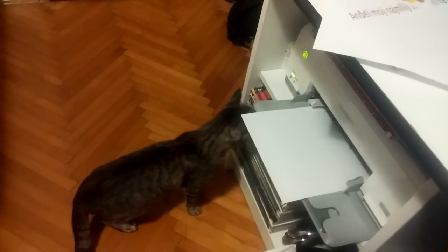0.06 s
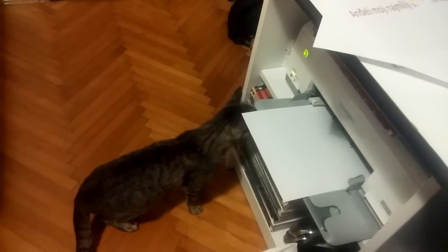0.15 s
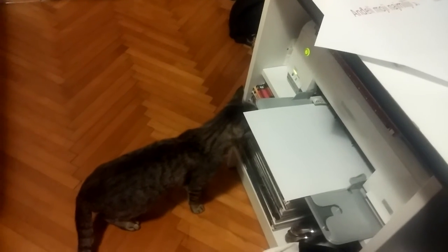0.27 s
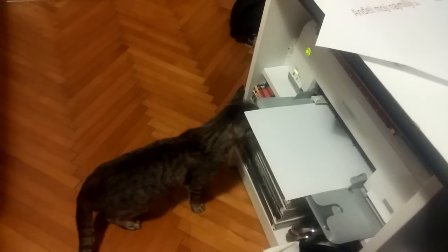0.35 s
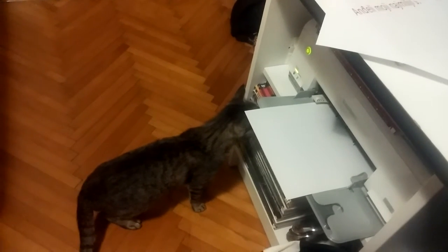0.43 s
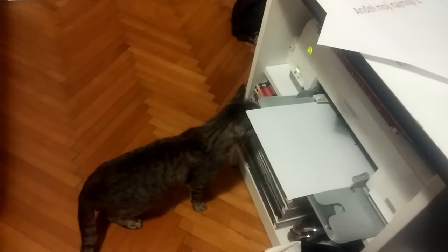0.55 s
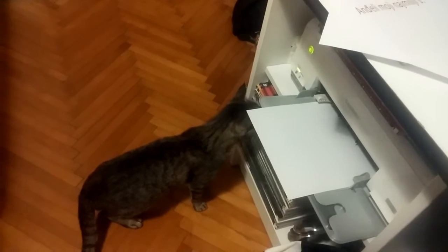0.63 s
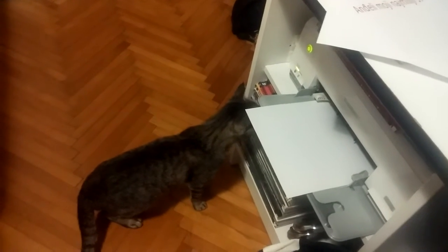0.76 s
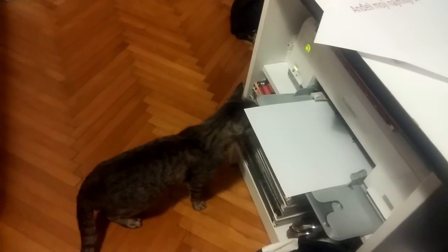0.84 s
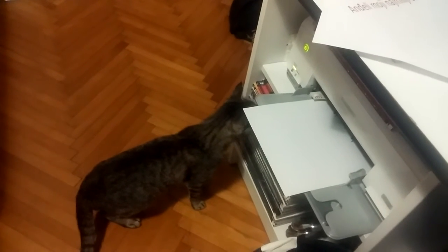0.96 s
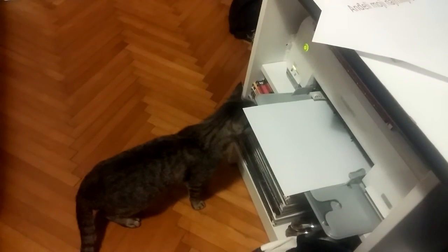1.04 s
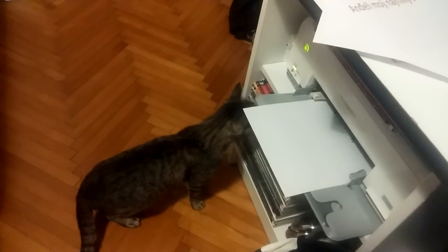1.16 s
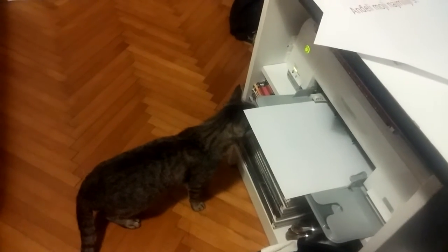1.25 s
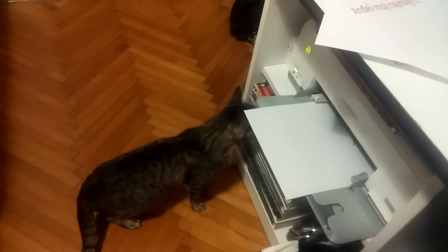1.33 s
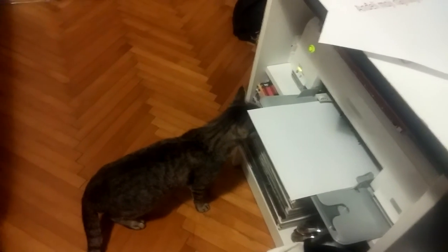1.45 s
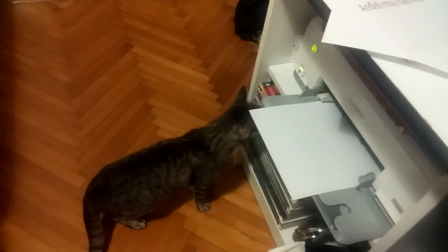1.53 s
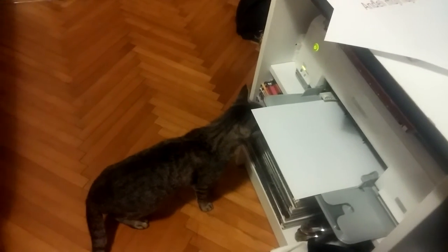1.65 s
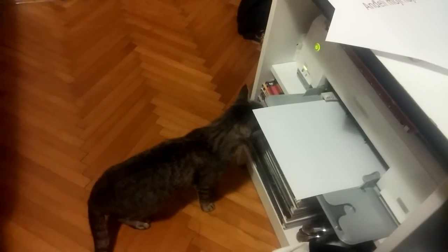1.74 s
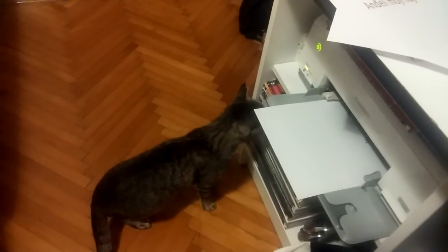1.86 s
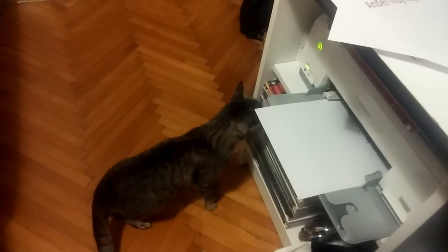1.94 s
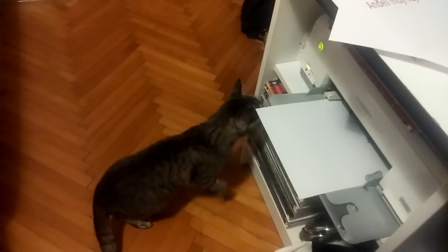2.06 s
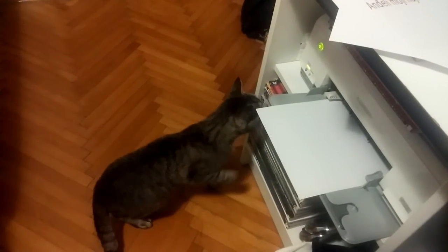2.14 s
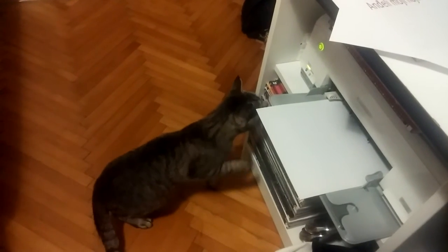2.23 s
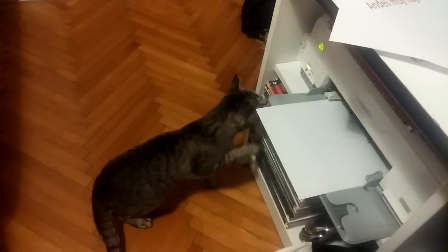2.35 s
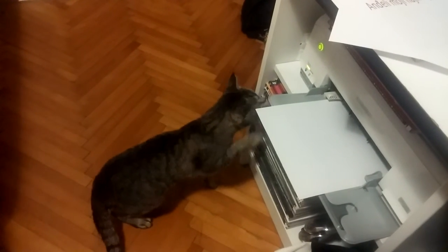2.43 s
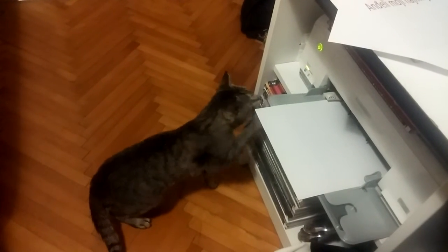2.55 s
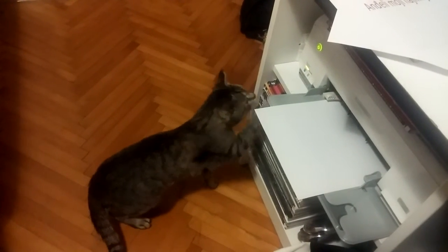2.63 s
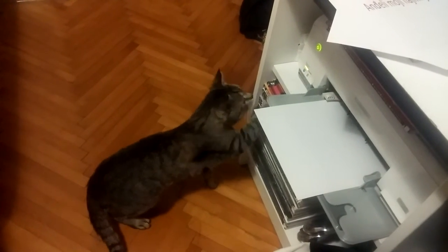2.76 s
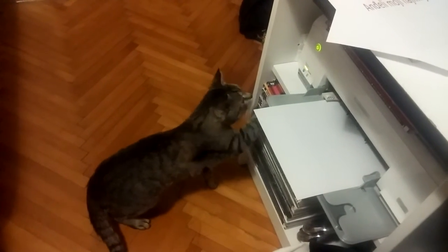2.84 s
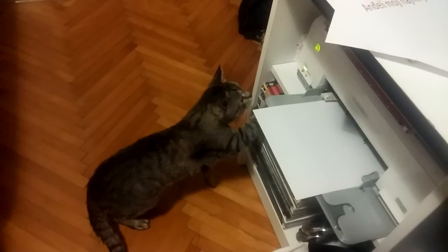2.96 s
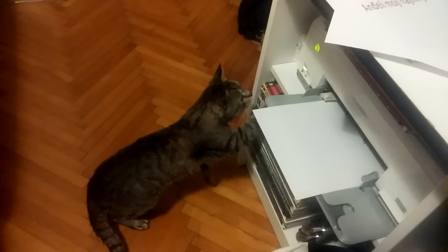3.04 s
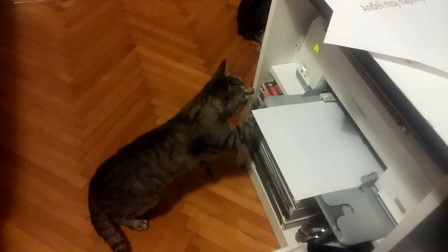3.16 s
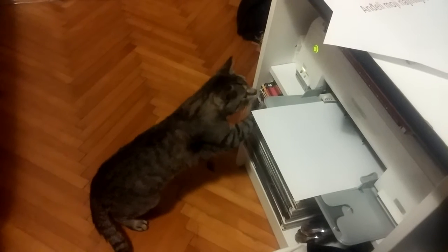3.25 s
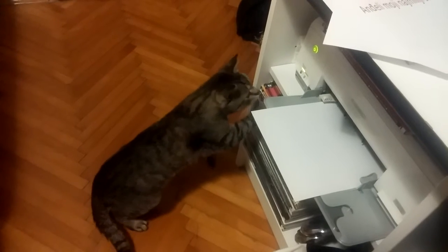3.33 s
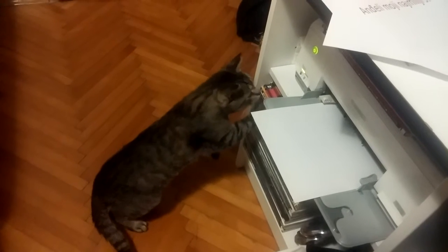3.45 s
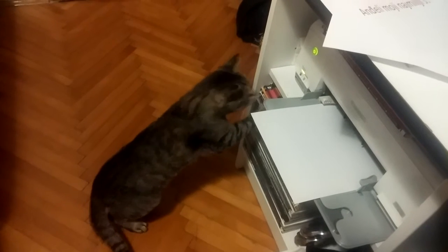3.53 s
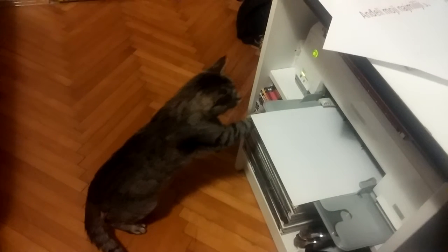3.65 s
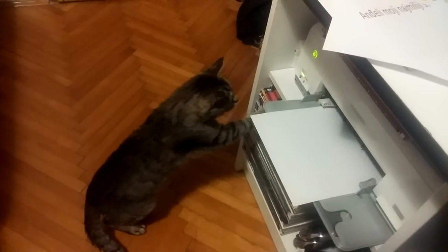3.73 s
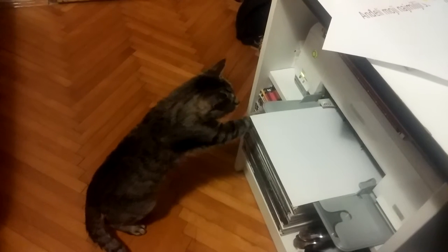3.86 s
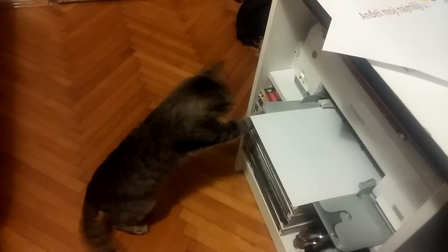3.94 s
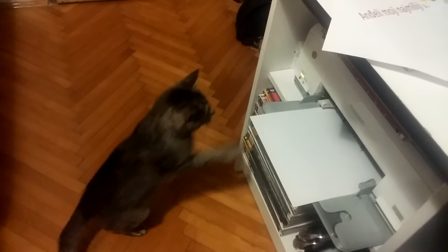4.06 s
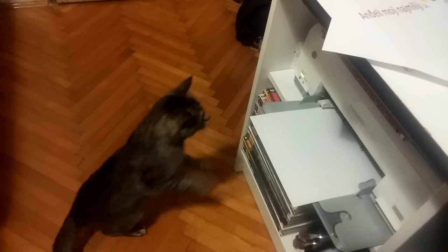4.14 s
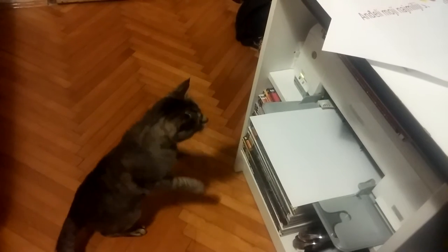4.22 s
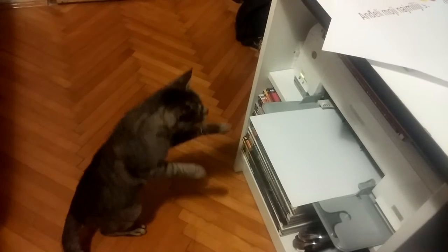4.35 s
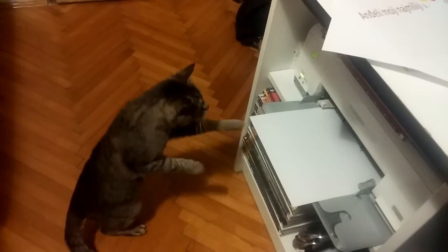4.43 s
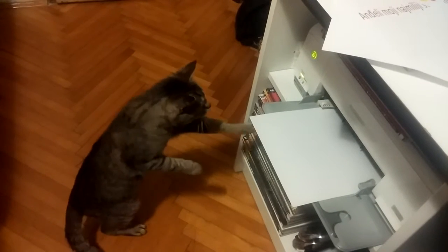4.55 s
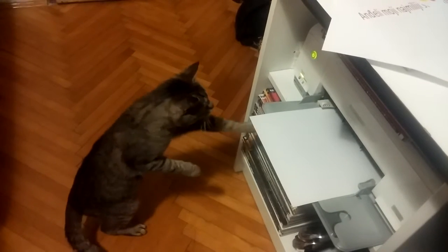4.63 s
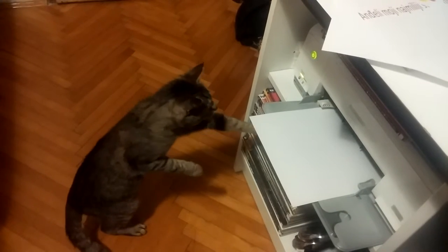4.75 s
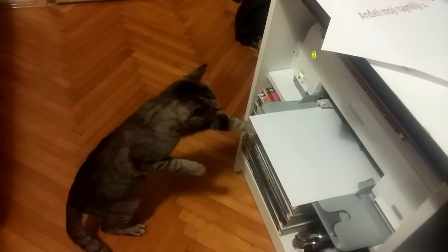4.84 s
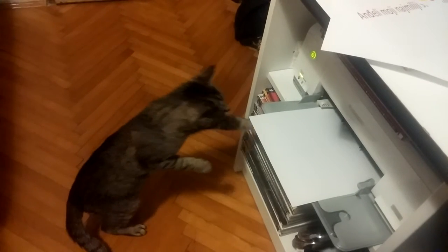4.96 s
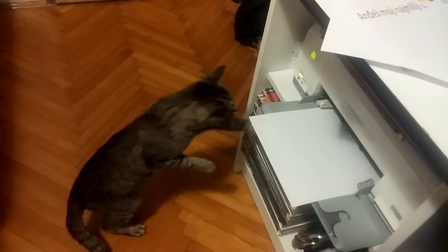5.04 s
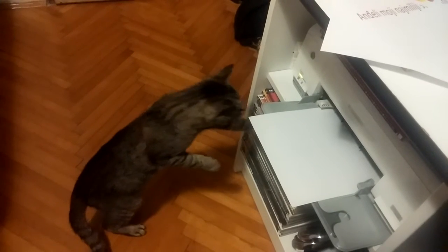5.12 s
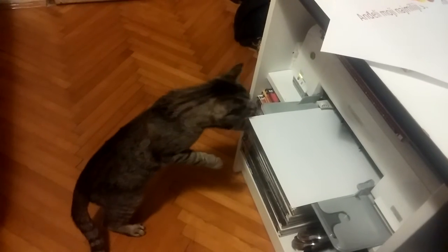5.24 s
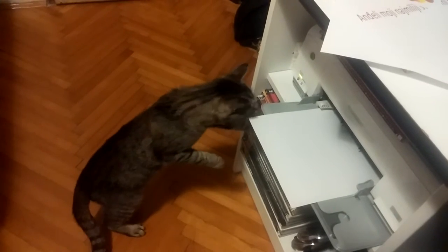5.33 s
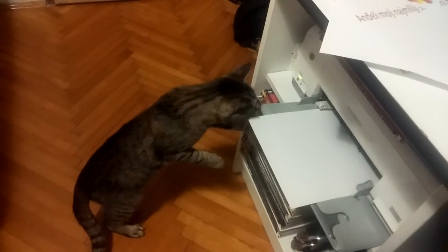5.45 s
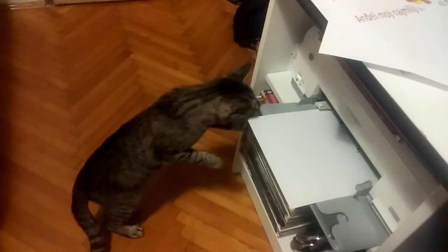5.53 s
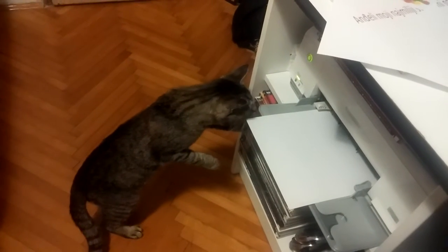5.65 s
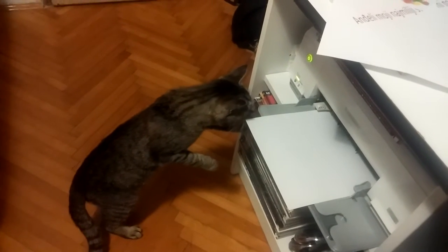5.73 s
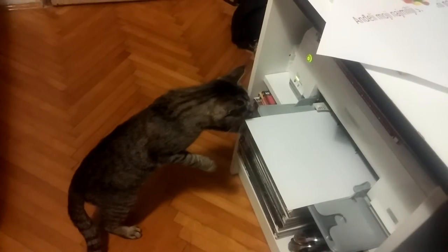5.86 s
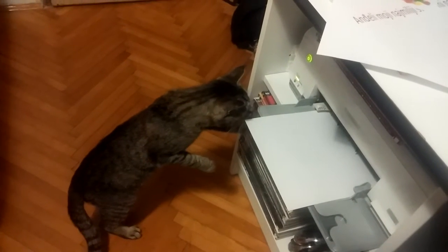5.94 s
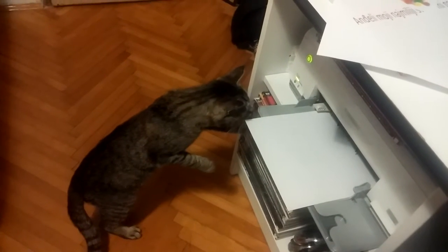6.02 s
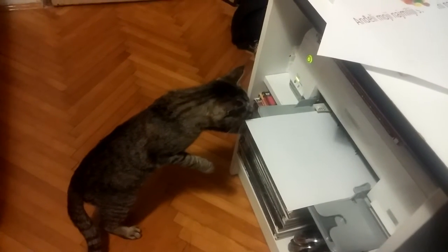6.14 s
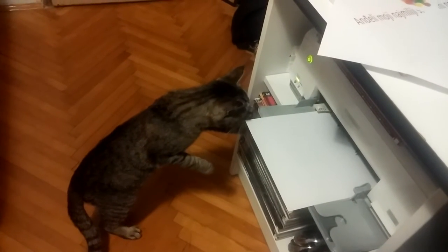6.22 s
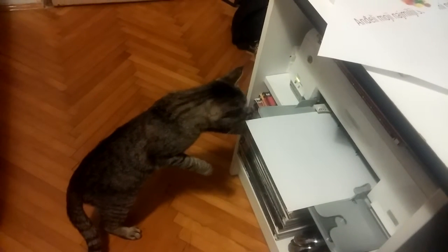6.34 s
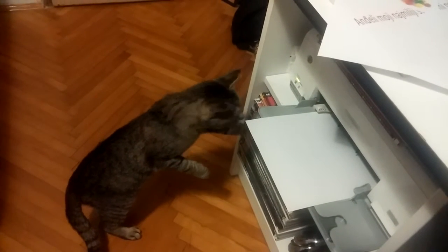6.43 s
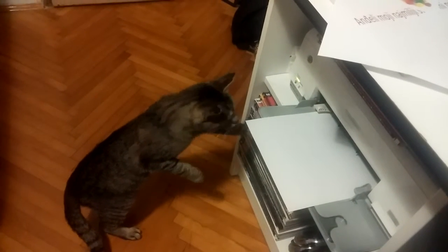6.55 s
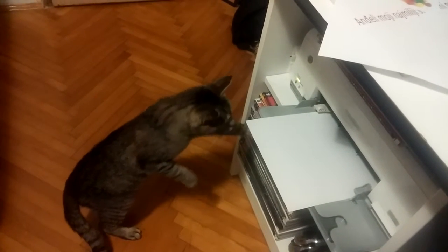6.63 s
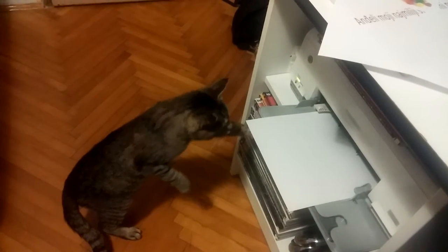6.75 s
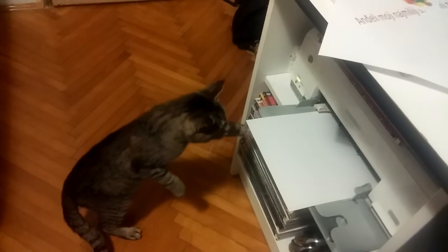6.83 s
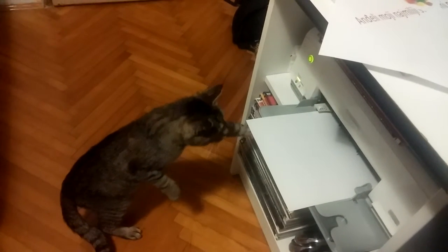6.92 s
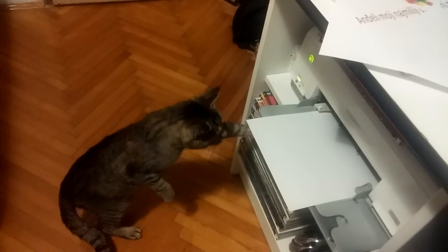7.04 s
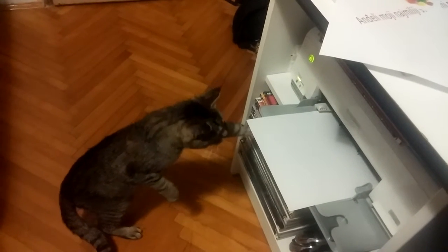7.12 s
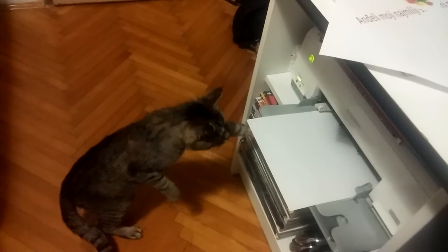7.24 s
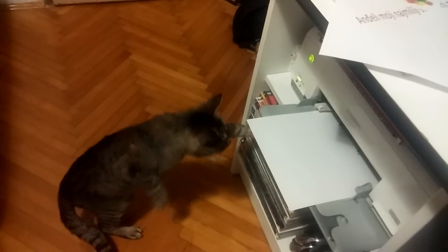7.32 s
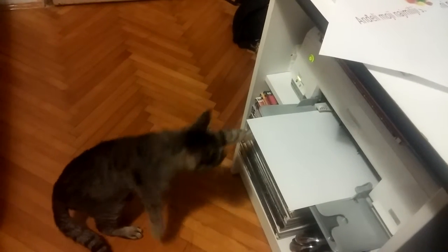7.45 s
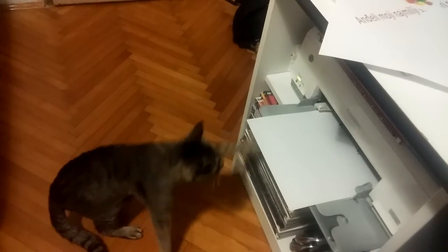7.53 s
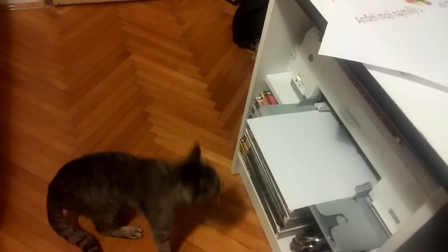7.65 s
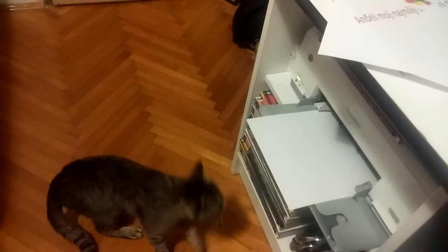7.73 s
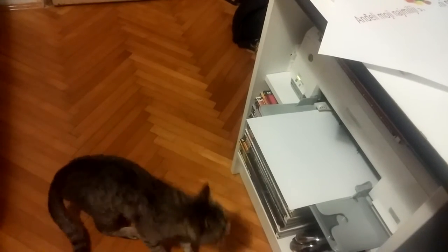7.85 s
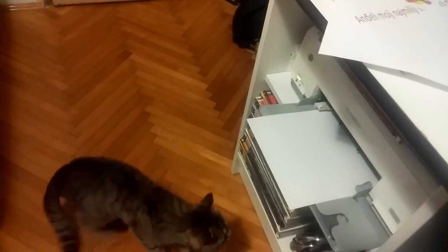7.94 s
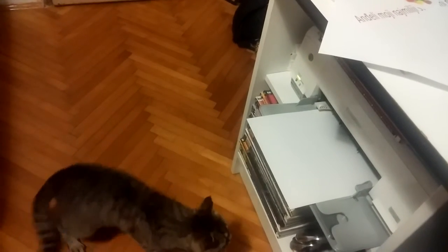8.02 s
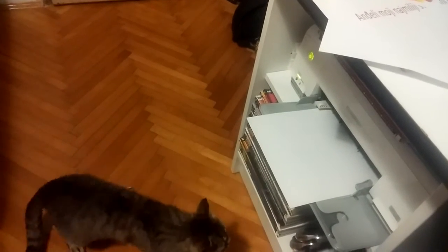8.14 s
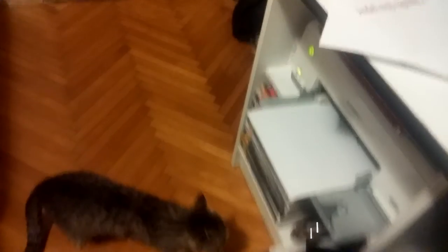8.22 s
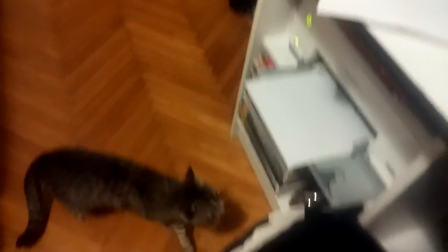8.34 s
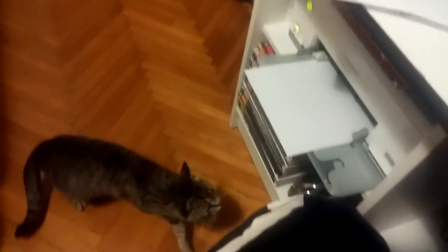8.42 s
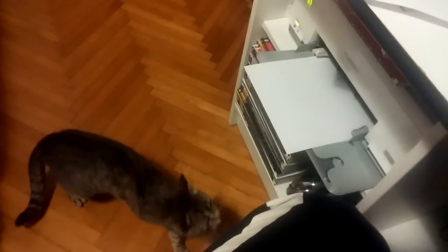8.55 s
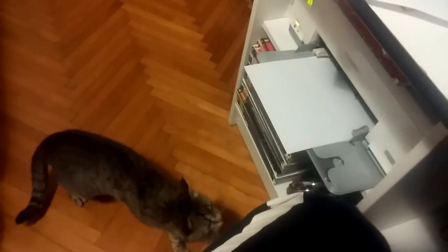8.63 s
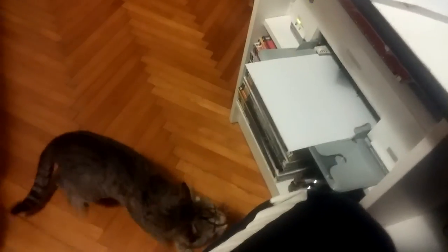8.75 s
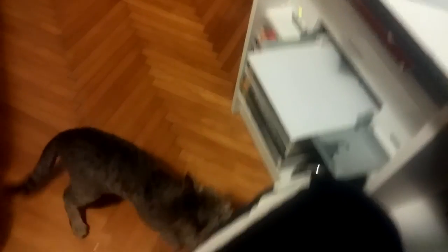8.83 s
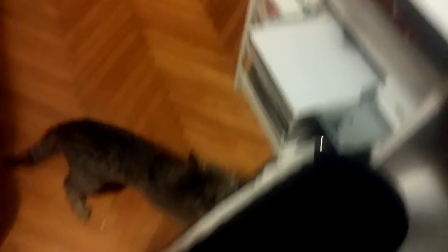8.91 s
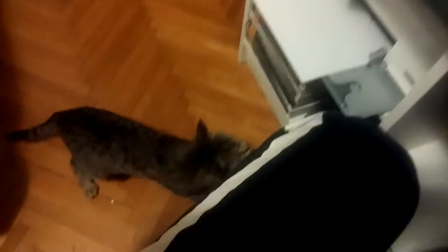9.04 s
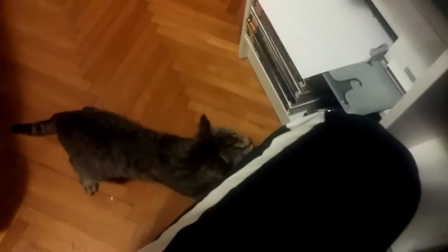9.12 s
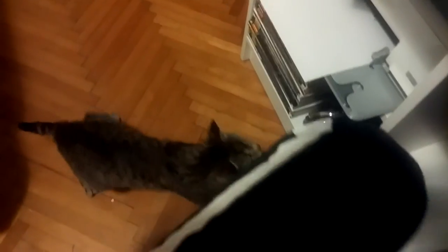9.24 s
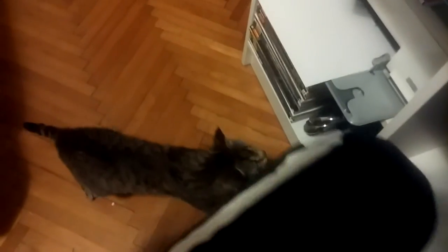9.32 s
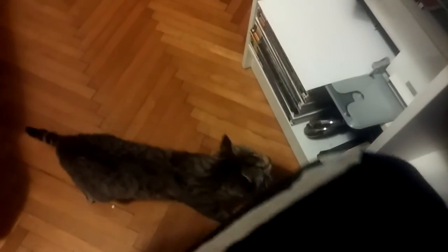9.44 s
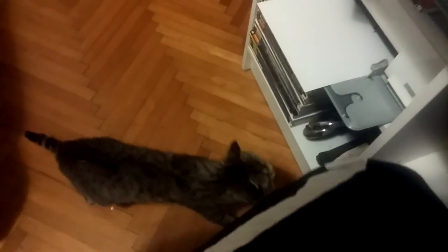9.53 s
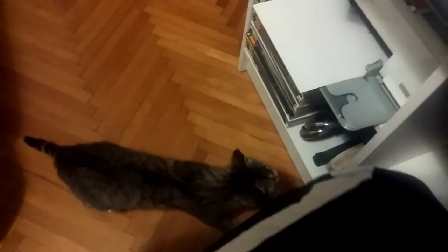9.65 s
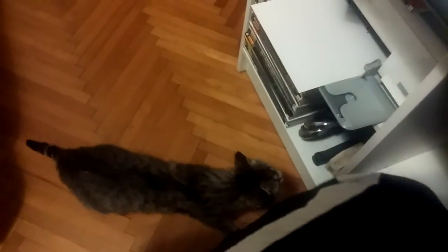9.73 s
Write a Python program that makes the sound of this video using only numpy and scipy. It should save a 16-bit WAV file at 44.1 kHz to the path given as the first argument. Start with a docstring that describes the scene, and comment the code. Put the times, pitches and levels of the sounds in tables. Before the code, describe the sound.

A quiet indoor room with soft air noise and a low wavering hum; a printer close by, louder on the left. The tail of a gear purr at 0 s, then short faint purrs around 0.7 and a stronger one at 1.3 s. Two tiny bright ticks at about 2 s, on the right, the second much louder. Faint gear moves at 2.6 and 3.7 s. At 4.1 s a latch drops with a loud, sharp double clunk and deep thump; a mid-pitched motor whine swells until 4.5 s. Hard clacks at 4.8-4.9 s, then rollers and gears whir to 5.9 s with a clack near 5.7. Printing passes run at 6.0-7.0, 7.2-8.2 and 8.3-9.3 s: dense plastic rattle, juddering carriage, airy paper rasp, springy snaps and low shelf thumps, with strong clacks near 8.2 and 9.2 s. From 9.6 s a ratchet knocks evenly and rapidly to the end.

```python
"""An inkjet printer works in a quiet room, louder on the left; air noise and a low hum waver throughout.
A gear train, toothed pulses through frame resonances, purrs in short moves; at 2 s two small bright ticks ring.
At 4.1 s a latch drops with two clunks, sharp contacts echoed by the casing, and a motor whines as paper is fed.
From 6 s come three printing passes of about a second: dense contacts rattle, a carriage judders in moving
resonances, a pawl snaps and the shelf thumps as damped swings; at the end a ratchet knocks evenly."""
import sys
import numpy as np
from scipy import signal
from scipy.fft import rfft, irfft, next_fast_len
from scipy.io import wavfile

SR = 44100
rng = np.random.default_rng(int(sys.argv[2]) if len(sys.argv) > 2 else 0)


def inscribe(sig):
    """Save sig as 16-bit PCM at rate SR to the path in sys.argv[1].

    A 1-D sig is mono; a 2-D sig holds one channel per row.
    Samples are clipped to [-1, 1] before scaling.
    """
    pcm = np.round(np.clip(np.atleast_2d(sig).T, -1, 1) * 32767)
    wavfile.write(sys.argv[1], SR, pcm.astype(np.int16))


N = 431298
TIME = np.arange(N) / SR
CLOCK = TIME[::32]  # slow control clock, s


def from_db(db):
    """Logarithmic level: decibels to amplitude gain."""
    return np.exp(np.asarray(db) * (np.log(10) / 20))


def rms_one(x):
    """Power normalization: scale to unit rms."""
    return x / np.sqrt(np.mean(x ** 2) + 1e-20)


def colour(x, points):
    """Linear filtering: weight the spectrum by a curve through (Hz, dB) points."""
    size = next_fast_len(x.shape[-1] + SR // 10, real=True)
    hz, db = np.transpose(points)
    log_hz = np.log(np.fft.rfftfreq(size, 1 / SR) + 1)
    gain = from_db(np.interp(log_hz, np.log(hz), db))
    return irfft(rfft(x, size) * gain, size)[..., :x.shape[-1]]


def drift(rate):
    """Slow random modulation: chance values joined by lines, rate per second; rms 1."""
    knots = rng.standard_normal(N // 40)
    return rms_one(np.interp(TIME * rate, np.arange(len(knots)), knots))


def add(out, s, sound):
    """Superposition: mix a sound in at a time in seconds."""
    part = out[..., round(s * SR):][..., :sound.shape[-1]]
    part += sound[..., :part.shape[-1]]


def gate(start_s, end_s, attack_s, t60_s):
    """Amplitude envelope: linear rise, hold and exponential decay, on the control clock."""
    rise = np.clip((CLOCK - start_s) / attack_s, 0, 1)
    return rise * from_db(-60 * np.clip((CLOCK - end_s) / t60_s, 0, 2))


def per_sample(control):
    """Interpolation: from the control clock to every sample."""
    return np.interp(TIME, CLOCK, control)


def resonate(x, hz, width_hz):
    """Simple resonance: a peak of gain 1 and the given bandwidth."""
    return signal.lfilter(*signal.iirpeak(hz, hz / width_hz, fs=SR), x + 1e-18)


def grains(per_s, spread_db):
    """Random impulses: tiny contacts at chance moments, uneven in size and sign; rms 1."""
    at = np.flatnonzero(rng.random(N) < per_s / SR)
    sizes = from_db(spread_db * np.minimum(rng.exponential(1, len(at)), 4))
    out = np.zeros(N)
    out[at] = sizes * rng.choice([-1, 1], len(at))
    return rms_one(out)


def stereo(mid, side, likeness):
    """Interchannel correlation: left and right share the mid and differ by the side."""
    alike = np.clip(likeness, 0, 1)
    return mid + np.sqrt((1 - alike) / (1 + alike)) * side * [[1], [-1]]


ROOM_T60_S = 0.37


def echoes(ring_t60, tail_db, likeness):
    """Diffuse impulse response: casing reflections build up and decay, over the room tail; unit mid energy."""
    t = np.arange(SR // 4) / SR
    rise_s, hold_s = .0012, .007
    ring = from_db(-60 * np.maximum(t - hold_s, 0) / ring_t60)
    tail = from_db(tail_db - 60 * t / ROOM_T60_S)
    mid, side = rng.standard_normal((2, len(t))) * (ring + tail) * (1 - np.exp(-t / rise_s))
    return stereo(mid, side, likeness) / np.sqrt(np.sum(mid ** 2))


# Spectrum of the air noise in the quiet room. Each row: frequency in Hz, relative level in dB.
AIR_SPECTRUM = [(25, -17), (55, 5), (420, -0.5), (1100, -14.5), (4000, -27), (6400, -31), (7000, -25.5),
                (7600, -30), (15000, -33.5)]
ROOM_DB, HUM_DB, HUM_HZ = -54, -58, 120


def room(flicker_db=1.23):
    """Background noise: filtered air noise and a low sine hum, both wavering."""
    air = rng.standard_normal(N) + .5 * rng.standard_normal((2, N))
    air = air * from_db(flicker_db * drift(4.84))
    hum = np.sin(2 * np.pi * HUM_HZ * TIME + .5 * drift(10)) * from_db(2 * drift(10))
    return from_db(ROOM_DB) * rms_one(colour(air, AIR_SPECTRUM)) + from_db(HUM_DB) * hum


# Small bright ticks. Each row: start in seconds, relative level in dB.
TICKS = [(1.963, -16.5), (2.023, -1)]
# Modes of the tapped thing. Each row: settled frequency in Hz, relative level in dB, decay t60 in seconds.
TICK_MODES = [(3840, -33.5, 0.032), (8800, -23, 0.015)]


def ticks(crack_db=-30, crack_t60=0.014, wet_db=-5, pan_db=3.0, sharp_hz=900, settle_s=0.003):
    """Modal impact: a small hard thing tapped on the right cracks, and two modes start sharp and settle."""
    t, out = np.arange(SR // 3) / SR, np.zeros(N)
    crack_band = signal.butter(2, [6000, 14000], "band", fs=SR, output="sos")
    crack = signal.sosfilt(crack_band, rng.standard_normal(len(t)))
    bend = sharp_hz * settle_s * (1 - np.exp(-t / settle_s))  # extra cycles of the sharp start
    ring = sum(from_db(db - 60 * t / t60) * np.sin(2 * np.pi * (hz * t + bend))
               for hz, db, t60 in TICK_MODES)
    tick = ring + 2 * crack * from_db(crack_db - 60 * t / crack_t60)
    tick *= np.minimum(t / .001, 1)
    for s, db in TICKS:
        add(out, s, from_db(db) * tick)
    wet = signal.fftconvolve(out[None], echoes(.12, -22, 0), axes=1)[:, :N]
    return (out + from_db(wet_db) * wet) * from_db([[-pan_db], [pan_db]])


# Runs of the rollers and carriage; the three long ones are printing passes. Each row: start in seconds,
# end in seconds, relative rattle in dB, relative sliding hiss in dB, swell over the run in dB.
RUNS = [(4.024, 4.119, -29, -43.5, 26.5), (4.246, 4.556, -38, -44, -12.5), (4.56, 4.677, -40, -50.5, -9),
        (4.82, 4.943, -26.5, -39.5, 5), (5.09, 5.598, -38.5, -54.5, 7), (5.574, 5.906, -37.5, -52, -7),
        (6.005, 6.992, -32, -42.5, 3.5), (7.225, 8.18, -34, -43.5, 10.5), (8.332, 9.306, -33, -44, 7),
        (9.472, 9.584, -34, -47.5, -5), (9.605, 9.78, -33.5, -42, -3)]
# Low thumps and thuds: shelf jolts, the faint thump under the second tick, the latch's lingering ring.
# Each row: start in seconds, relative low swing in dB, relative thud in dB.
THUMPS = [(2.023, -52, -51.5), (4.107, -17.5, -24), (4.2, -27, -40), (4.545, -48, -30.5), (4.841, -33, -21),
          (4.911, -25, -13), (4.954, -36, -22), (6.041, -24.5, -36), (6.106, -25, -54), (6.334, -32, -32),
          (6.428, -28, -31), (6.56, -27.5, -27.5), (6.884, -26, -30), (7.235, -26.5, -30),
          (7.391, -34.5, -31), (7.898, -41, -30), (8.1, -34, -25), (8.364, -21.5, -34), (8.404, -29, -37.5),
          (8.716, -25.5, -32), (8.855, -26, -26), (9.234, -30.5, -36)]
RUN_ATTACK_S, RUN_T60_S = 0.0082, 0.26
# a faint steady rattle and hiss from shortly before the feed, lasting to the end under the runs
STEADY_FROM_S, STEADY_RATTLE_DB, STEADY_HISS_DB = 3.6, -56.5, -67
# rattle and hiss after each thump: level relative to its swing, and settling time
SHAKE_RATTLE_DB, SHAKE_HISS_DB, SHAKE_T60_S = -3, -14, 0.63


def feed_force():
    """Power summation: rattle and sliding hiss, from a faint steady part, the runs and the thumps."""
    power = (from_db([[STEADY_RATTLE_DB], [STEADY_HISS_DB]]) * (CLOCK > STEADY_FROM_S)) ** 2
    for start, end, rattle_db, hiss_db, swell_db in RUNS:
        progress = np.clip((CLOCK - start) / (end - start), 0, 1)
        swell = from_db(swell_db * (progress - .5))
        envelope = swell * gate(start, end, RUN_ATTACK_S, RUN_T60_S)
        power += (from_db([[rattle_db], [hiss_db]]) * envelope) ** 2
    for s, db, _ in THUMPS:
        shaking = gate(s, s, RUN_ATTACK_S, SHAKE_T60_S)
        power += (from_db([[db + SHAKE_RATTLE_DB], [db + SHAKE_HISS_DB]]) * shaking) ** 2
    return [per_sample(np.sqrt(p)) for p in power]


# Resonances of the shelf. Each row: frequency in Hz, width in Hz, relative level in dB.
SHELF_MODES = [(90.3, 12.4, 3.5), (120, 23.5, 1), (139, 10.7, -1), (230.1, 6, -2.5)]


def shelf(rattle, rumble_db=-2, rise_s=0.028, rock_hz=105, scatter=0.051, thump_db=5.5):
    """Forced and free vibration: the rattle keeps the shelf rumbling; each low thump swings up and dies away."""
    shake = rattle * rng.standard_normal(N)
    rumble = sum(from_db(db) * resonate(shake, hz, width) * (-1) ** k
                 for k, (hz, width, db) in enumerate(SHELF_MODES))
    out = rms_one(rumble) * np.std(shake) * from_db(rumble_db)
    t = np.arange(SR // 3) / SR
    swing = (t / rise_s * np.exp(1 - t / rise_s)) ** 2
    for (s, db, _), detune in zip(THUMPS, rng.standard_normal(len(THUMPS))):
        rocking = np.sin(2 * np.pi * rock_hz * (1 + scatter * detune) * t)
        add(out, s, from_db(db + thump_db) * swing * rocking)
    return out


def paper(slide, paper_db=-10.5, low_hz=6800):
    """Friction noise: the sliding sheet lies outside the casing and adds an airy rasp."""
    airy = signal.butter(2, low_hz, "high", fs=SR, output="sos")
    rasp = signal.sosfilt(airy, rng.standard_normal((2, N)))
    return from_db(paper_db) * slide * rasp


WHINE_START_S, WHINE_END_S, WHINE_ATTACK_S, WHINE_T60_S = 4.19, 4.52, 0.37, 0.059
WHINE_DB = -32


def whine(hz=769, third_db=-11, sag=0.023, spin_up_s=0.0736):
    """Rotational tone: the feed motor's pitch climbs a little, then holds with a slight flutter."""
    speed = 1 - sag * np.exp(-np.maximum(TIME - WHINE_START_S, 0) / spin_up_s)
    phase = 2 * np.pi * np.cumsum(hz * speed * (1 + .006 * drift(120))) / SR
    envelope = per_sample(gate(WHINE_START_S, WHINE_END_S, WHINE_ATTACK_S, WHINE_T60_S))
    level = from_db(WHINE_DB + 1.5 * drift(30)) * envelope
    return np.sqrt(2) * level * (np.sin(phase) + from_db(third_db) * np.sin(3 * phase))


# Narrow whirs of the feed wheels. Each row: start in seconds, end in seconds, frequency in Hz,
# relative level in dB.
WHIRS = [(4.1, 4.166, 2330, -19), (4.293, 4.537, 5400, -51.5), (9.597, 9.78, 10800, -59)]
WHIR_Q, WHIR_ATTACK_S, WHIR_T60_S = 7.5, 0.021, 0.15


def whirs(ring_t60=0.022, tail_db=-17, likeness=0.23):
    """Resonant friction: fast wheels rub, dense contacts sounding through one narrow peak each."""
    rub, force = grains(1500, 2.0), 0
    for start, end, hz, db in WHIRS:
        ring = resonate(resonate(rub, hz, hz / WHIR_Q), hz, 2 * hz / WHIR_Q)
        level = per_sample(from_db(db) * gate(start, end, WHIR_ATTACK_S, WHIR_T60_S))
        force = force + rms_one(ring) * level
    return signal.oaconvolve(force[None], echoes(ring_t60, tail_db, likeness), axes=1)[:, :N]


RATCHET_FROM_S, RATCHET_STEP_S = 9.603, .0565


def ratchet(body_hz=420, width_hz=70, body_db=0, edge_db=-7):
    """Periodic impact: in the last run a ratchet knocks evenly, a hollow ring with a hard edge."""
    low_hz, high_hz, *reflections = REGISTERS[1]
    edge_band = signal.butter(2, [low_hz, high_hz], "band", fs=SR, output="sos")
    out = np.zeros((2, N))
    for s in np.arange(RATCHET_FROM_S, N / SR, RATCHET_STEP_S):
        contact = echoes(*reflections)
        body = resonate(contact, body_hz, width_hz)
        edge = signal.sosfilt(edge_band, contact)
        for part, db in ((body, body_db), (edge, edge_db)):
            add(out, s, from_db(db) * part / np.linalg.norm(part[0]))
    return out


# Main, louder part of each gear move, some quiet and some strong. Each row: start in seconds,
# end in seconds, relative mesh level in dB.
GEAR_MOVES = [(-.03, 0.036, -35), (0.684, 0.985, -47.5), (1.245, 1.444, -37), (2.546, 2.668, -48),
              (3.608, 3.815, -46.5), (4.224, 4.533, -40.5), (5.107, 5.542, -43.5), (5.584, 5.855, -35.5)]
GEAR_ATTACK_S, GEAR_T60_S = 0.016, 0.034
CREEP_DB, CREEP_AFTER_S = -61, 0.02
TAKE_UP_S = .085  # the gears take up their slack this long before the main part


def mesh_force():
    """Power summation: each gear move is a creep, the louder main part and a creep to rest."""
    power = 0
    for start, end, db in GEAR_MOVES:
        creep = from_db(CREEP_DB) + 0.17 * from_db(db)
        creep = creep * gate(start - TAKE_UP_S, end + CREEP_AFTER_S, GEAR_ATTACK_S / 2, GEAR_T60_S)
        main = from_db(db) * gate(start, end, GEAR_ATTACK_S, GEAR_T60_S)
        power = power + creep ** 2 + main ** 2
    return per_sample(np.sqrt(power)) * from_db(1.3 * drift(25))


# The clearest snaps of the pawl. Each row: start in seconds, relative level in dB.
PAWL_SNAPS = [(1.281, -43), (1.329, -47), (6.203, -38), (6.813, -39), (6.849, -37), (7.966, -38),
              (8.031, -33), (9.149, -33.5)]
PRINTING_FROM_S, GEAR_FEED_FROM_S = 6.0, 3.6


def pawl(slide, chatter_db=-2, snap_db=26, hz=5550, width_hz=850, ring_t60=0.0061, gear_share=0.12):
    """Impulse response: a springy pawl snaps, and chatters while the paper slides or the gears feed it."""
    drive = slide * (TIME > PRINTING_FROM_S) + gear_share * mesh_force() * (TIME > GEAR_FEED_FROM_S)
    force = from_db(chatter_db) * grains(45, 2.5) * drive
    for s, db in PAWL_SNAPS:
        add(force, s, from_db([db + snap_db]))
    response = echoes(ring_t60, *REGISTERS[-1][-2:])
    response = resonate(resonate(response, hz, width_hz), hz, 2 * width_hz)
    return signal.oaconvolve(force[None], response / np.linalg.norm(response[0]), axes=1)[:, :N]


# Resonances of the carriage and its rail. Each row: mean frequency in Hz, relative level in dB.
CARRIAGE_MODES = [(360, -12), (830, -9.5), (1213, -4.5), (1800, -4.5)]
CARRIAGE_Q = 17


def carriage(rattle, level_db=-3.5):
    """Time-varying resonance: the juddering carriage's dense knocks ring in modes that shift as it travels."""
    knocks = grains(220, 2.7) * from_db(2.5 * drift(30)) * rattle * (TIME > PRINTING_FROM_S)
    out = 0
    for hz, db in CARRIAGE_MODES:
        r = np.exp(-np.pi * hz / CARRIAGE_Q / SR)  # decay per sample
        turn = np.exp(2j * np.pi * np.cumsum(hz * (1 + .04 * drift(9))) / SR)
        # shift the mode down to zero frequency, let it decay there, shift it back
        still = knocks * rng.choice([-1, 1], N) / turn + 1e-18
        ring = turn * signal.lfilter([1], [1, -r], still)
        out = out + from_db(db) * rms_one(ring.imag)
    return from_db(level_db) * np.std(knocks) * out


def teeth(per_s, wobble, uneven_db):
    """Tooth-passing pulses: one snap per tooth, uneven in strength; rms 1."""
    turns = np.cumsum(per_s * (1 + wobble * drift(15))) / SR
    sizes = from_db(uneven_db * np.clip(rng.standard_normal(N), -2, 2))
    return rms_one(np.diff(np.floor(turns), prepend=0) * sizes)


# Resonances of the gear frame. Each row: frequency in Hz, width in Hz, relative level in dB.
GEAR_MODES = [(327, 210, -3), (733, 79, 0), (869, 30, 1), (1100, 194, -3), (1330, 130, -1.5),
              (1550, 216, -5.5), (2130, 280, -5.5), (3800, 1540, -3.5), (5120, 330, 2.5), (6360, 490, 0.5)]
MESH_HZ = 61.4


def gear_purr(gear_db):
    """Modal filtering: tooth pulses and fine random contacts excite the gear frame."""
    contacts = teeth(MESH_HZ, .003, 3.0) + .7 * grains(400, 3.0)
    return sum(from_db(gear_db + db) * resonate(contacts, hz, width) * (-1) ** k
               for k, (hz, width, db) in enumerate(GEAR_MODES))


def rollers(likeness, flutter_db=3.5):
    """Broadband contact noise: dense rolling contacts, with no place and so no fixed pitch; stereo."""
    mid, side = rng.standard_normal((2, N))
    return from_db(flutter_db * drift(70)) * stereo(mid, side, likeness)


def clack(response, centre_hz, hardness_db):
    """Contact stiffness: each part favours a pitch of its own, lower when the contact is soft."""
    hz = centre_hz * 2 ** ((hardness_db + 12) / 60 + .12 * rng.standard_normal())
    return .5 * response + resonate(response, hz, hz / 2)


# Colour of the plastic casing. Each row: frequency in Hz, relative level in dB.
CASING = [(140, 14), (195, -1), (240, 5), (310, 3.5), (390, 5.5), (500, 2), (620, -2), (850, 7),
          (1350, 2.5), (2200, 0.5), (3200, -9.5), (4100, -22), (5500, -15), (8000, -20), (12000, -34.5),
          (15500, -55)]


def casing(x, low_hz, high_hz):
    """Radiation filter: one register of the casing, with unit gain for white noise."""
    if high_hz > SR / 5:  # the top register stays open above
        band = signal.butter(4, low_hz, "high", fs=SR, output="sos")
    else:
        band = signal.butter(4, [low_hz, high_hz], "band", fs=SR, output="sos")
    click = colour(signal.sosfilt(band, signal.unit_impulse(SR // 5, "mid")), CASING)
    return colour(signal.sosfilt(band, x), CASING) / np.linalg.norm(click)


# Clacks of latches, cams and stops. Each row: start in seconds, relative strength in dB,
# hardness as treble over middle in dB.
CLACKS = [(2.747, -51.5, -24), (4.108, -16, -8.5), (4.121, -18, -4), (4.163, -20, -11.5), (4.546, -32, -17),
          (4.833, -26, -0.5), (4.842, -18.5, -16), (4.916, -16, -7.5), (5.375, -28, -10.5),
          (5.681, -20, -20), (5.692, -20.5, -29), (5.909, -27.5, -11), (6.033, -30, -7),
          (6.095, -21, -10.5), (6.131, -30.5, -1), (6.201, -33.5, -4), (6.345, -29, -5),
          (6.411, -28, -11.5), (6.457, -23.5, -5), (6.547, -29.5, -16), (6.941, -20.5, -6),
          (6.95, -21, -45), (7.003, -29, -7), (7.223, -30, -11), (7.468, -30.5, -5), (7.586, -27.5, -0.5),
          (7.815, -28, -17.5), (7.901, -27, -17.5), (8.138, -21, -4.5), (8.188, -14, -19.5),
          (8.195, -16, -58), (8.333, -29, -10.5), (8.401, -29, -2.5), (8.432, -24.5, -6),
          (8.642, -27.5, -5.5), (8.702, -28.5, -12.5), (8.754, -22.5, -6.5), (9.239, -18, -9),
          (9.307, -30, -19), (9.473, -36.5, -20)]
# Body, clack and snap registers of the casing. Each row: low edge in Hz, high edge in Hz (the snap register
# has no upper cut), ring t60 in seconds, room tail in dB, left-right likeness from 0 to 1.
REGISTERS = [(146.7, 605, 0.23, -7, 0.85), (565, 2970, 0.088, -9.5, 0.68), (2944, 8840, 0.051, -7, 0.0079)]
CLACK_BODY_DB = -5.5  # low ring of the casing, relative to the strength
TAKE_UP_DB, TAKE_UP_HARDNESS_DB = -49, -22  # click as the gears take up their slack


def printer(rattle, slide, gear_body_db=-6, gear_hiss_db=-17, feed_body_db=1, gear_db=4, roll_db=-7.0,
            knock_db=-13, clack_s=0.023):
    """Source and radiator: gears, rollers, loose parts, clacks and thuds all sound through the casing."""
    mesh = mesh_force()
    mesh_hiss = mesh * from_db(gear_hiss_db) * np.sqrt(mesh / mesh.max())  # harder meshing is brighter
    # drives for the body, clack and snap registers
    gear_drive = [mesh * from_db(gear_body_db), mesh, mesh_hiss]
    feed_drive = [rattle * from_db(feed_body_db), rattle, slide]
    purr = gear_purr(gear_db)
    knocks = from_db(knock_db) * grains(45, 3.0)
    load = drift(14)  # the load shifts to and fro between two gear wheels
    take_ups = [(start - TAKE_UP_S, TAKE_UP_DB, TAKE_UP_HARDNESS_DB)
                for start, *_ in GEAR_MOVES if start > TAKE_UP_S]
    blow_gain = np.sqrt(clack_s * SR)
    out = np.zeros((2, N))
    for k, (low_hz, high_hz, *reflections) in enumerate(REGISTERS):
        sound = from_db(roll_db) * feed_drive[k] * rollers(reflections[-1])
        # each fixed part acts at a place of its own, so each has its own reflections
        gears = purr * gear_drive[k]
        for force in (gears * np.cos(load), gears * np.sin(load), knocks * feed_drive[k]):
            sound += signal.oaconvolve(force[None], echoes(*reflections), axes=1)[:, :N]
        for s, db, hardness_db in [*CLACKS, *take_ups]:
            level_db = db + (CLACK_BODY_DB, 0, hardness_db)[k]
            blow = clack(echoes(*reflections), np.sqrt(low_hz * high_hz), hardness_db)
            add(sound, s, from_db(level_db) * blow_gain * blow)
        if k == 0:  # thuds reach only the body register
            for s, _, thud_db in THUMPS:
                add(sound, s, from_db(thud_db) * blow_gain * echoes(*reflections))
        out += casing(sound, low_hz, high_hz)
    return out


# Stereo balance of the printer. Each row: frequency in Hz, left over right in dB.
BALANCE = [(100, 2.5), (500, 4.5), (1290, 10.5), (5500, 9.5), (15000, 2.5)]
LEFT_LAG_S = 0.00013


def scene():
    """Superposition: the printer louder on the left, the ticks on the right, the room all round."""
    rattle, slide = feed_force()
    machine = printer(rattle, slide) + carriage(rattle) + pawl(slide) + shelf(rattle)
    left, right = machine + paper(slide) + whirs() + ratchet() + whine()
    left = colour(left, [(hz, db / 3) for hz, db in BALANCE])
    right = colour(right, [(hz, -2 * db / 3) for hz, db in BALANCE])
    left = np.interp(TIME - LEFT_LAG_S, TIME, left)
    return np.array([left, right]) + ticks() + room()


def record(dry):
    """Soft saturation and low-pass filtering: the loudest peaks are rounded and the top is cut."""
    top_cut = signal.ellip(10, .1, 80, 15900, fs=SR, output="sos")
    return signal.sosfilt(top_cut, 1.063 * np.tanh(dry / 1.15))


dry = scene()
out = record(dry)
inscribe(out)
```